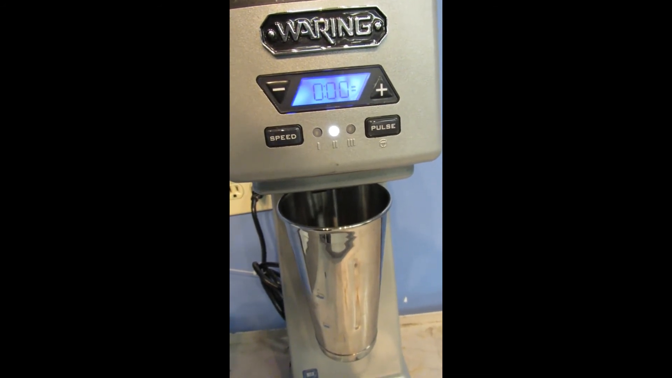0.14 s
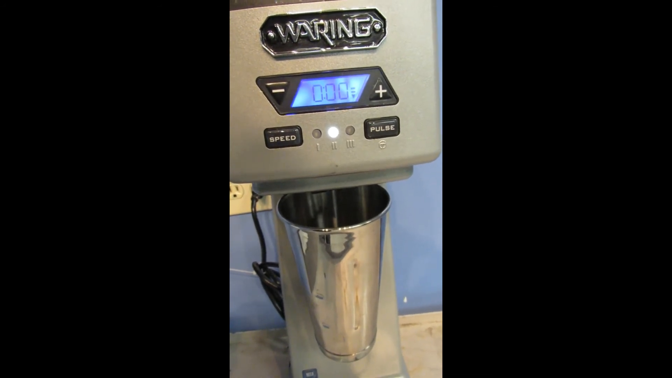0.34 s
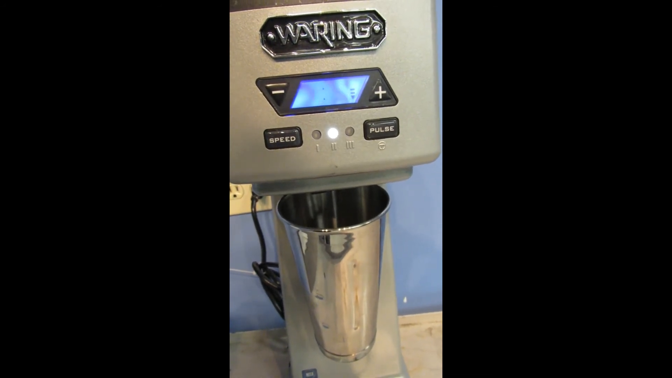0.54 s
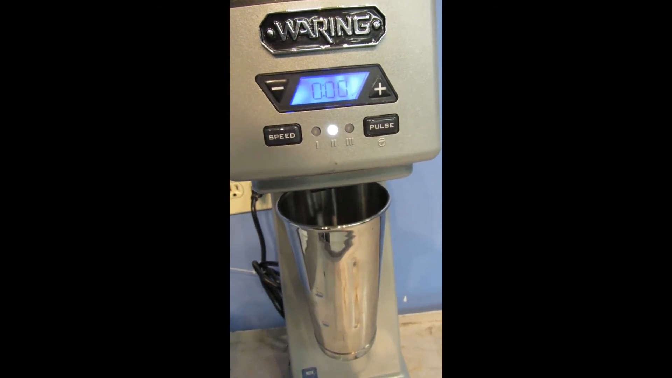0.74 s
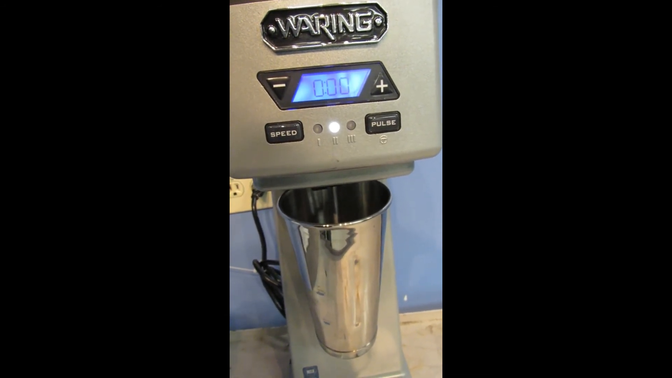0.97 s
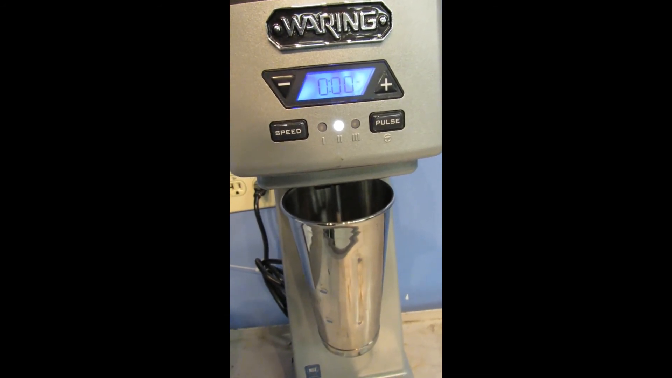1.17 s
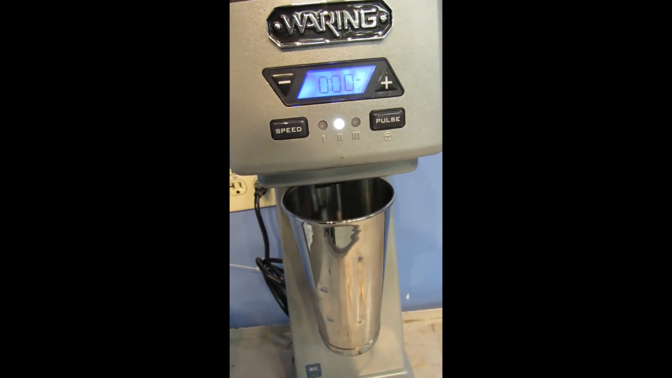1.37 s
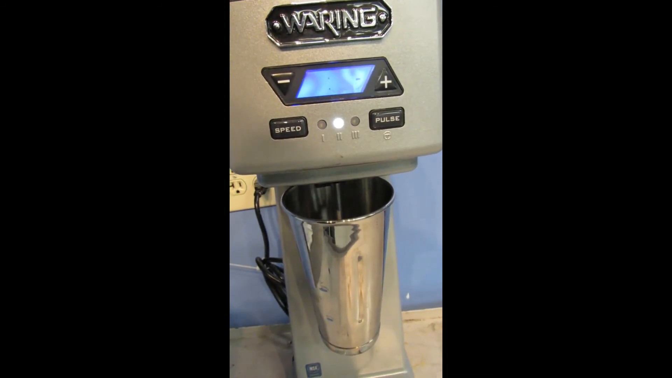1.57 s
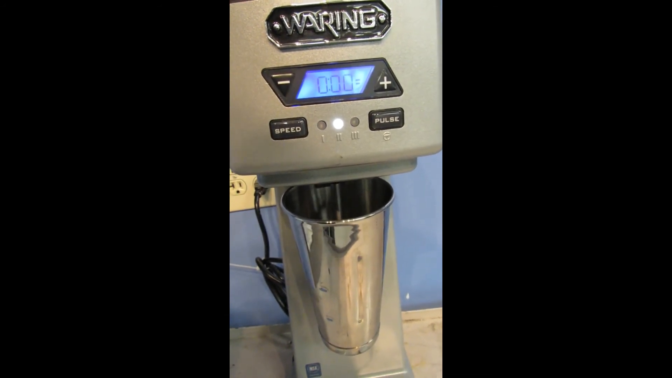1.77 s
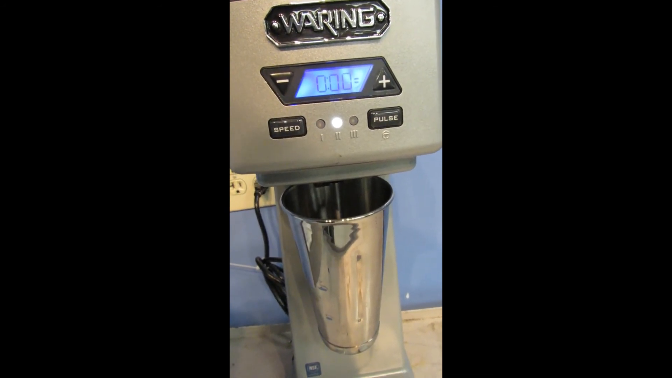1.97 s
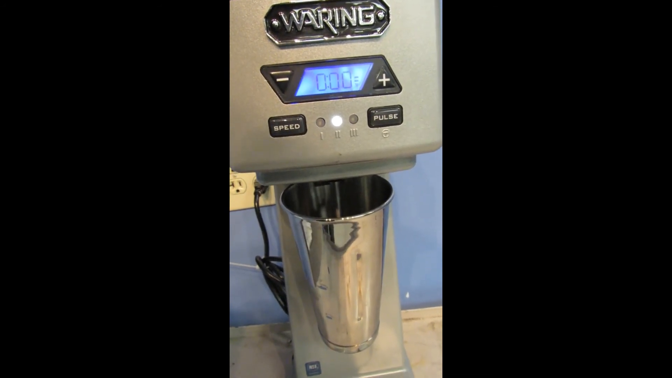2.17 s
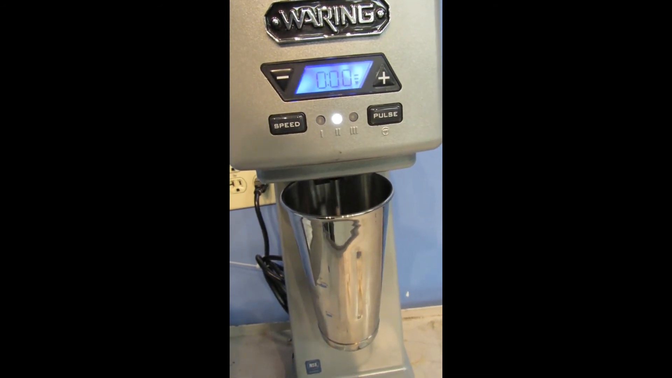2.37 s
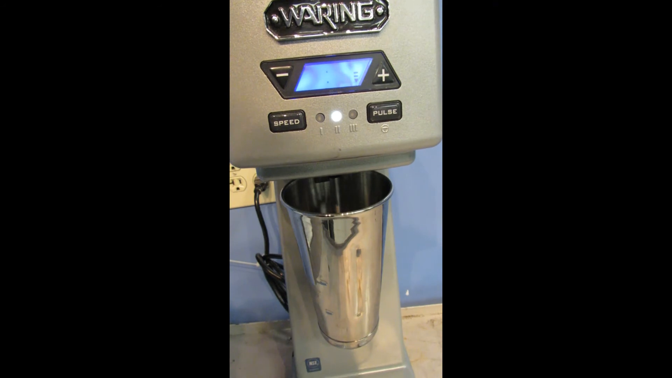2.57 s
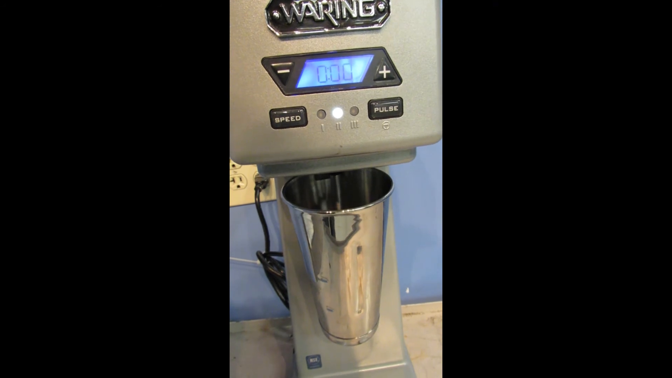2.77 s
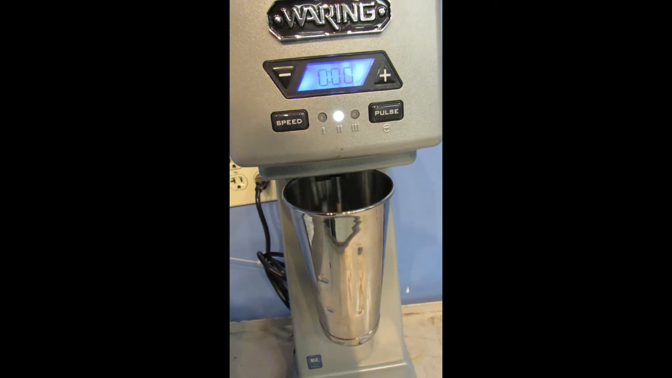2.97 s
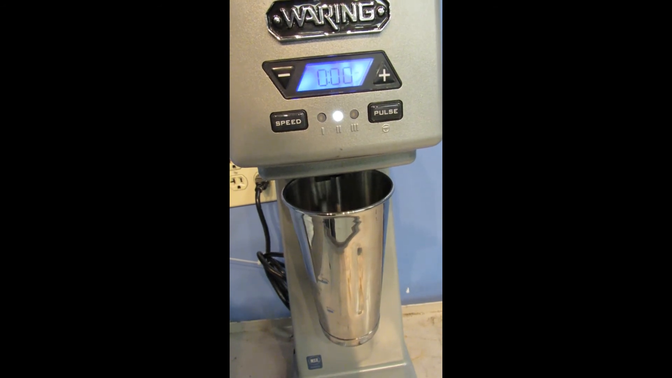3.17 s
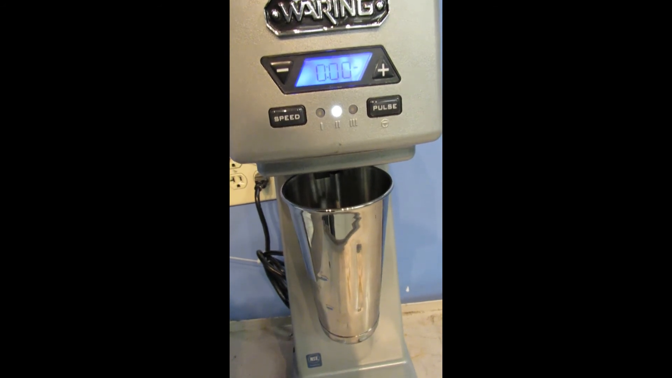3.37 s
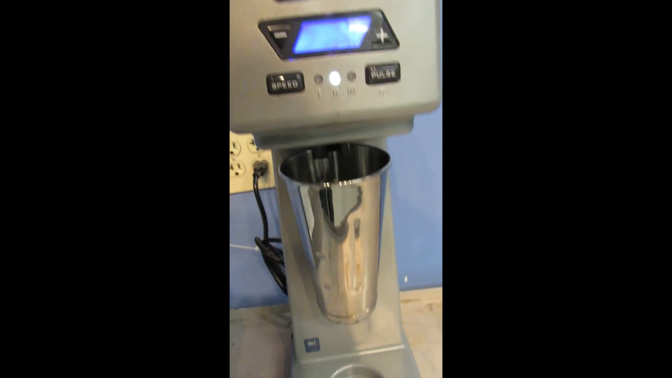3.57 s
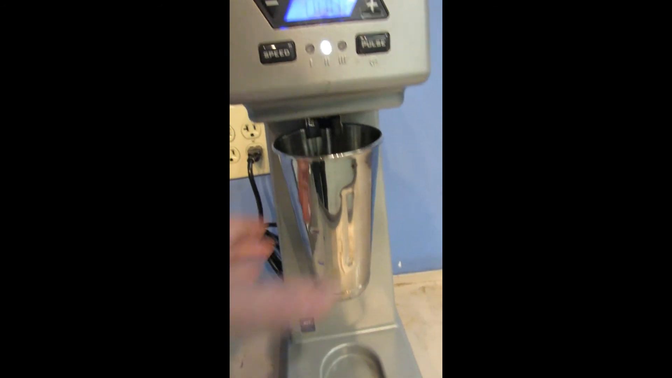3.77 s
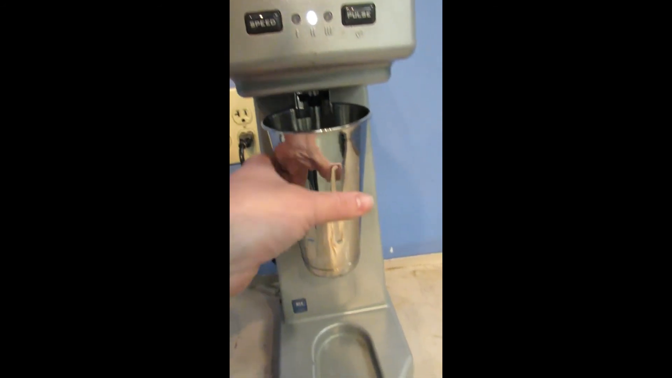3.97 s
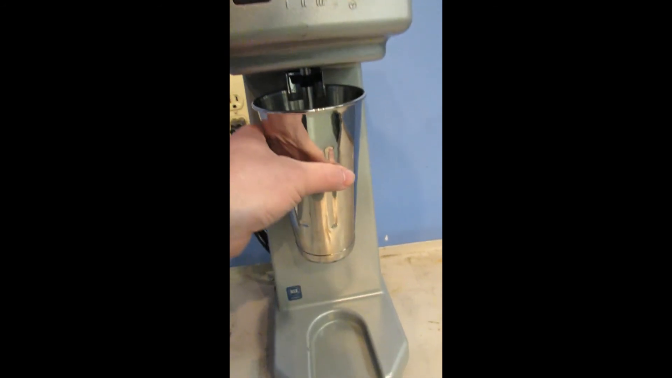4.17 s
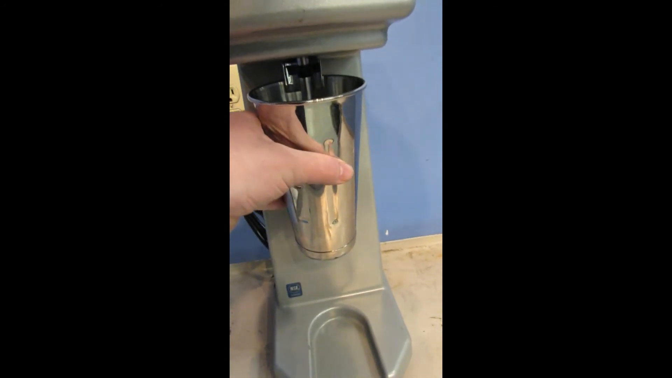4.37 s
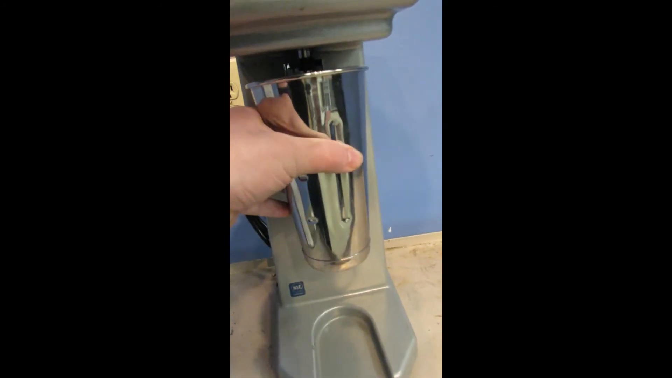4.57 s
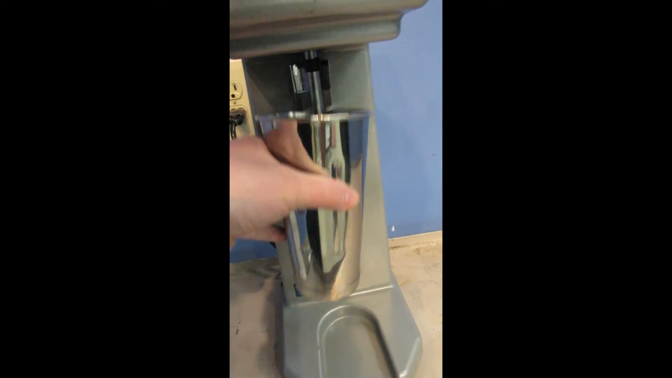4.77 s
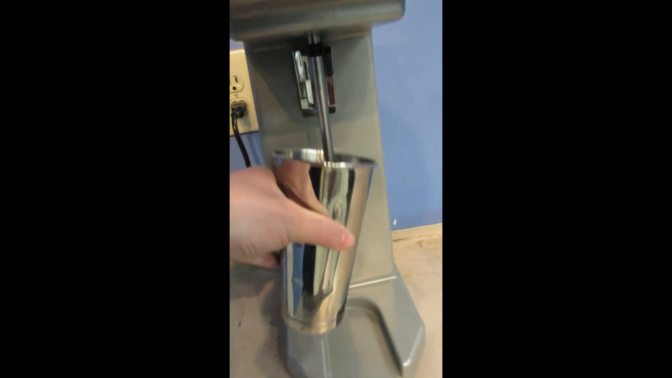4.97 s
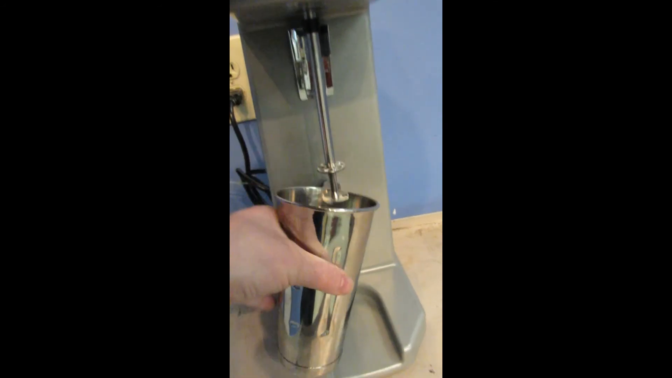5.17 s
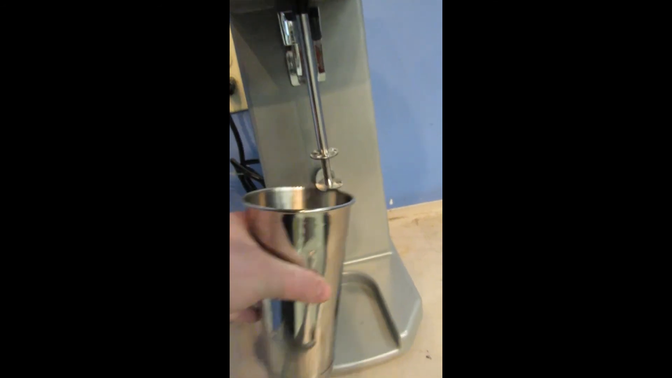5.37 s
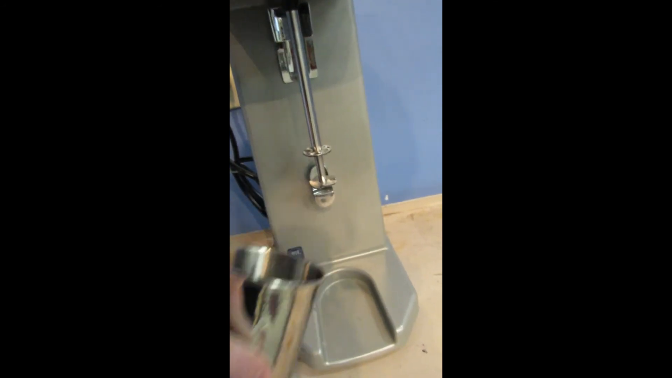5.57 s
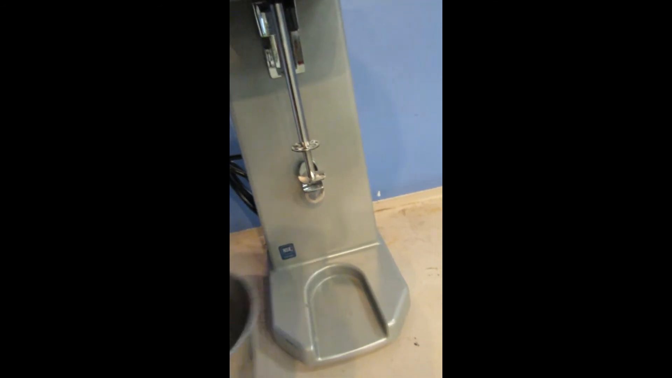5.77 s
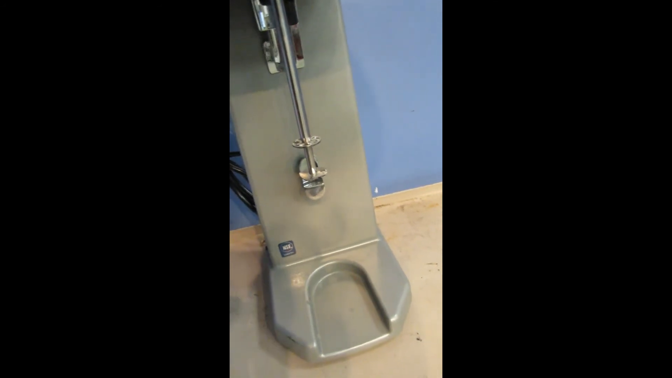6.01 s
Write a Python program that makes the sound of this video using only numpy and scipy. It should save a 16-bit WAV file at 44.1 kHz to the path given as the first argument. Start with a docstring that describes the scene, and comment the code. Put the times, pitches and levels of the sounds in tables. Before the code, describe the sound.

Close up in a small workroom, an electric drink mixer coasts to a stop with a falling whine and low hum, its steel cup rattling briefly at first. Faint ventilation and electrical hum remain. A sleeve swishes softly, then the cup is unhooked with sharp clanks, scrapes along its guide with a short squeal, knocks against the mixing shaft and lands on the counter with a thump.

```python
"""A small workroom, close to a spindle drink mixer that coasts to a stop over ventilation and mains hum.
Bearings and fan whirr and the rotor slots whine; the unbalanced shaft sweeps down through the
resonances of the stand and at first rattles the steel cup. A sleeve swishes, then a hand unhooks
the cup, slides it off its guide, knocks it on the agitator and sets it on the counter."""
import sys
import numpy as np
from scipy import signal
from scipy.fft import rfft, irfft, next_fast_len
from scipy.io import wavfile
from scipy.ndimage import uniform_filter1d

SR = 44100
rng = np.random.default_rng(int(sys.argv[2]) if len(sys.argv) > 2 else 0)


def waveform_to_disk(signal):
    """Save audio, clipped to [-1, 1], as 16-bit WAV at the path in sys.argv[1]."""
    frames = np.transpose(np.atleast_2d(signal))
    scaled = np.clip(frames, -1, 1) * 32767
    samples = np.round(scaled).astype(np.int16)
    wavfile.write(sys.argv[1], SR, samples)


N = 266364
T = np.arange(N) / SR
HZ = np.fft.rfftfreq(N, 1 / SR)
START_HZ = 276.4  # shaft speed at 0 s

# Bouts of cup chatter. Each row: start in s, length in s, level in dB, share lost by every second hit.
CHATTER_BOUTS = [(-.03, 0.15, -26, 0.85), (0.117, 0.12, -26, 0.33), (0.208, 0.09, -24, 1),
                 (0.313, 0.021, -25, 0.67), (0.388, 0.036, -22, 1)]
# Modes of the unhooked cup. Each row: frequency in Hz, level in dB, T60 in s before hand damping.
CUP_MODES = [(1002, -0.5, .22), (1271, 7.5, 0.17), (1785, -2, .22), (2330, 2, 0.16), (2595, 4, 0.097),
             (2720, 8.5, 0.13), (2934, -8.5, 0.4), (3140, -19.5, .16), (3700, -13, 0.23),
             (3800, -2.5, 0.13), (4620, 3, 0.12), (5400, -17, 0.085), (5927, -26, 0.26), (6900, -20.5, .14),
             (6640, -19, 0.055), (8800, -14, 0.14), (9100, -15, .12), (11000, -26.5, .1)]
# Low modes of stand and counter. Each row: frequency in Hz, level in dB, T60 in s.
THUMP_MODES = [(175, -17, .14), (269, -3, .17), (345, -6, .11), (409, -3, .13), (463, -2, .14),
               (545, -8, .11)]
# Radiation of the stand. Each row: frequency in Hz, gain in dB.
STAND_RADIATION = [(50, -26), (90, -4), (130, 1), (550, -2), (620, -22), (750, -8.5), (1000, -2.5),
                   (1500, -30)]


def amp(db):
    """Decibels to gain."""
    return 10 ** (np.asarray(db) / 20)


def unit(x):
    """Scales to rms 1."""
    return x / np.sqrt(np.mean(x ** 2) + 1e-20)


def curve(rows):
    """A time table at every sample."""
    return np.interp(T, *np.transpose(rows))


def at_hz(spectrum, hz):
    """Interpolates a table over log frequency."""
    table_hz, value = np.transpose(spectrum)
    return np.interp(np.log(hz + 1), np.log(table_hz + 1), value)


def colour(x, spectrum):
    """Filters by a table of Hz, dB."""
    size = next_fast_len(len(x) + SR // 10, True)
    gain = amp(at_hz(spectrum, np.fft.rfftfreq(size, 1 / SR)))
    return irfft(rfft(x, size) * gain, size)[:len(x)]


def noise(spectrum):
    """Coloured noise, rms 1."""
    return unit(colour(rng.standard_normal(N), spectrum))


def wander(hz):
    """Random drift below about hz, rms 1."""
    return unit(irfft(rfft(rng.standard_normal(N)) * np.exp(-(HZ / hz) ** 2), N))


def stereo_noise(spectrum):
    """Coloured noise, partly alike left and right."""
    # Each row: frequency in Hz, left-right correlation.
    correlation = [(60, 0.3), (180, 0.81), (550, 0.19), (1650, 0.42), (4970, 0.76), (15000, -0.049)]
    left, other = noise(spectrum), noise(spectrum)
    alike = np.clip(at_hz(correlation, HZ), 0, 1)
    right = irfft(alike * rfft(left) + np.sqrt(1 - alike ** 2) * rfft(other), N)
    return np.array([left, right])


def resonate(x, hz, width_hz):
    """One resonance, peak gain 1."""
    return signal.lfilter(*signal.iirpeak(hz, hz / width_hz, SR), x)


def body(x, resonances):
    """Resonances driven in parallel."""
    return sum(amp(db) * resonate(x, hz, width_hz) for hz, width_hz, db in resonances)


def ringing(modes, t, spread_db, detune):
    """Decaying modes, weighted and detuned at random for each contact."""
    draws = rng.standard_normal((len(modes), 2))
    return sum(amp(db + spread_db * a - 60 * t / t60_s) * np.sin(2 * np.pi * hz * (1 + detune * b) * t)
               for (hz, db, t60_s), (a, b) in zip(modes, draws))


def damped_sine(t, hz, cycles):
    """A swing that falls to 1/e in the given cycles."""
    return np.sin(2 * np.pi * hz * t) * np.exp(-t * hz / cycles)


def held(start_s, length_s, attack_s, release_s):
    """Envelope: linear rise, hold, exponential release."""
    rise = np.clip((T - start_s) / attack_s, 0, 1)
    return rise * np.exp(-np.maximum(T - start_s - length_s, 0) / release_s)


def swell(middle_s, half_s):
    """Bell-shaped envelope."""
    return np.exp(-np.minimum(((T - middle_s) / half_s) ** 2, 50))


def add(mix, start_s, sound):
    """Mixes a sound in at start_s."""
    part = mix[round(start_s * SR):][:len(sound)]
    part += sound[:len(part)]


def room(x, wet_db, early_db, side_db, early_s=0.0069, echoes_per_s=4000):
    """Adds dense reflections from counter and wall, and a tail that dies faster in the treble."""
    # Each row: frequency in Hz, T60 in s.
    decay = [(150, 1), (450, 0.67), (1200, 0.47), (3000, 0.3), (8000, 0.087), (15000, 0.11)]
    # Left-right difference of the reflections. Each row: frequency in Hz, gain in dB.
    spread = [(100, -10), (1000, 0), (2200, -9.5), (4500, -5.5), (9000, 8), (14000, 11)]
    t = np.arange(SR) / SR
    taps = rng.choice([-1., 1.], (2, SR)) * (rng.random((2, SR)) < echoes_per_s / SR) * (t > .002)
    hz, frame_s, bins = signal.stft(taps, SR, nperseg=256)
    fade = amp(-60 * frame_s / at_hz(decay, hz)[:, None])
    tail = signal.istft(bins * fade, SR, nperseg=256)[1][:, :SR]
    early = taps * np.exp(-t / early_s)
    response = (amp(wet_db) * unit(tail) + amp(early_db) * unit(early)) / np.sqrt(SR)
    mid, side = signal.fftconvolve(x[None], response, axes=1)[:, :N]
    return x + mid + amp(side_db) * colour(side, spread) * np.array([[1], [-1]])


def ambience(waver_rad=0.27):
    """Ventilation and mains hum, sinking at the end."""
    # Each row: frequency in Hz, relative density in dB.
    ventilation = [(15, -37.5), (25, -7), (86, -11.5), (122, -11), (148, -9.5), (246, -14.5), (297, -14.5),
                   (378, -12), (421, -15), (537, -17), (684, -33), (1110, -26.5), (2560, -39.5),
                   (13500, -44), (15500, -58.5)]
    # Each row: frequency in Hz, level in dB re the ventilation.
    mains = [(119.8, -5.5), (240, -9)]
    # Each row: time in s, level in dB.
    levels = [(2.6, -48.5), (4.0, -45.5), (5.1, -48), (5.8, -55)]
    hum = sum(amp(db) * unit(np.sin(2 * np.pi * hz * T + waver_rad * wander(1.9))) for hz, db in mains)
    return amp(curve(levels)) * (stereo_noise(ventilation) + hum)


def sleeve(dull_hz=1500, bright_hz=9000):
    """Cloth swishes as the arm reaches out, duller or brighter with each move."""
    # Each row: frequency in Hz, relative density in dB.
    spectrum = [(800, -4), (2000, -4), (5000, -9.5), (9000, 0.5), (12000, -5), (15000, -6.5)]
    # Each row: middle in s, half length in s, level in dB, treble tilt in dB.
    swishes = [(3.39, 0.047, -49.5, -7), (3.647, 0.16, -55, -7.5), (3.905, 0.28, -59, -1),
               (4.247, .07, -54.5, -7)]
    cloth = stereo_noise(spectrum)
    out = 0
    for middle_s, half_s, db, tilt_db in swishes:
        tilt = [(dull_hz, -tilt_db), (bright_hz, tilt_db)]
        out += amp(db) * swell(middle_s, half_s) * np.array([colour(side, tilt) for side in cloth])
    return out


def grip(middle_s=4.335, half_s=0.28, level_db=-45, width_hz=70, rub_db=-15):
    """The tightening grip rubs the cup on its holder and stirs the low modes of the stand."""
    # Each row: frequency in Hz, relative density in dB.
    rub_spectrum = [(500, -14), (1200, -6), (2700, 3.5), (5500, -7.5), (9000, -24)]
    stirred = body(rng.standard_normal(N), [(hz, width_hz, db) for hz, db, _ in THUMP_MODES])
    murmur = unit(colour(stirred, STAND_RADIATION))
    return amp(level_db) * swell(middle_s, half_s) * (murmur + amp(rub_db) * noise(rub_spectrum))


def slide(grain=.55, ring_db=-8, ring_width_hz=40, squeal_db=-3, full_squeal_db=-36):
    """Steel slips on steel in grains; pressed hard it squeals in stick-slip. The rubbing rings the cup."""
    # Strokes along the guide. Each row: start in s, length in s, level in dB.
    strokes = [(4.453, 0.11, -49.5), (4.68, 0.074, -56.5), (4.73, 0.12, -38), (4.852, 0.031, -32.5),
               (4.98, 0.5, -67.5)]
    # Each row: frequency in Hz, relative density in dB.
    scrape = [(410, -59.5), (700, -18.5), (861, -12), (1190, -2.5), (2110, -15.5), (2300, -3), (2800, -3.5),
              (3360, -14), (4030, -7), (5150, -10.5), (9230, -11), (13100, -18.5), (15500, -30.5)]
    # Each row: time in s, slips per second.
    slip_rate = [(4.74, 1580), (4.78, 1320), (4.82, 1260), (4.86, 1800), (4.9, 1750)]
    pressure = np.max([amp(db) * held(start_s, length_s, attack_s=0.011, release_s=0.0095)
                       for start_s, length_s, db in strokes], axis=0)
    rub = unit(noise(scrape) * np.exp(grain * wander(190)))
    slips = np.cumsum(curve(slip_rate) * (1 + .012 * wander(80))) / SR
    harmonics = sum(np.cos(2 * np.pi * k * slips) * (1 + .6 * wander(30)) / k ** .25 for k in range(1, 9))
    squeal = amp(squeal_db) * unit(harmonics) * np.minimum(pressure / amp(full_squeal_db), 1)
    ring = body(rub, [(hz, ring_width_hz, db) for hz, db, _ in CUP_MODES])
    return pressure * (rub + amp(ring_db) * unit(ring) + squeal)


def blows(knock_hz=1110, flex_hz=576, tick_s=0.0019, hand_damping=1.7, focus_db_per_octave=9):
    """Each blow on the cup: a damped knock, contact noise, the cup's ring, a thump of stand and counter."""
    # Each row: start in s, knock in dB, tick in dB, clatter decay in s, relative ring in dB,
    # relative thump in dB, thump centre in Hz.
    impacts = [(4.264, -29, -50, 0.008, -54, -41, 400), (4.443, -29.5, -54, .011, -44.5, -36, 400),
               (4.470, -18, -47.5, .011, -41, -34, 400), (4.4805, -7, -4, 0.0052, -39.5, -23, 304),
               (4.51, -10, -15.5, 0.04, -43, -6.5, 260), (4.531, -18.5, -19.5, 0.026, -32, -16, 266),
               (4.54, -23, -22, 0.017, -29, -14.5, 260), (4.802, -38, -31, 0.012, -39.5, -24, 327),
               (4.9078, -15.5, -29.5, 0.031, -37, -31, 388), (4.924, -21, -45, 0.0083, -43, -33.5, 400),
               (5.1886, 3, -12, 0.0027, -47, -10.5, 510), (5.3197, -21, -21.5, 0.023, -24, -17, 480),
               (5.362, -15.5, -23.5, 0.012, -36.5, -21.5, 449), (5.403, -26, -58, .011, -52, -18, 380),
               (5.9637, -8, -17.5, 0.047, -28.5, -3, 318.4), (5.975, -3, -31.5, 0.017, -43, -10, 240),
               (5.988, -11, -33, 0.035, -32, -9, 420)]
    # Each row: frequency in Hz, relative density in dB.
    tick_spectrum = [(120, -29.5), (500, -9.5), (1200, 8), (2700, 6), (3500, -0.5), (6000, 0.5), (8500, -4),
                     (12000, -8), (15000, -19.5)]
    out, t = np.zeros(N), np.arange(SR // 2) / SR
    contact = noise(tick_spectrum)
    gripped = [(hz, db, t60_s / hand_damping) for hz, db, t60_s in CUP_MODES]
    # The wall gives at the spot; the whole cup flexes more slowly.
    knock = damped_sine(t, knock_hz, cycles=1.2) + amp(-9) * damped_sine(t, flex_hz, cycles=1.2)
    for start_s, knock_db, tick_db, clatter_s, ring_db, thump_db, centre_hz in impacts:
        grit = contact[rng.integers(N - len(t)):][:len(t)]
        tick = grit * (np.exp(-t / tick_s) + amp(-15) * np.exp(-t / clatter_s))
        ring = amp(ring_db - 8) * ringing(gripped, t, spread_db=3.5, detune=.011)
        low_modes = [(hz, db - focus_db_per_octave * abs(np.log2(hz / centre_hz)), t60_s)
                     for hz, db, t60_s in THUMP_MODES]
        thump = amp(thump_db - 13.5) * ringing(low_modes + low_modes, t, spread_db=1, detune=.06)
        add(out, start_s, amp(knock_db) * knock + amp(tick_db) * tick + ring + thump)
    # Small objects radiate no deep bass.
    return signal.sosfilt(signal.butter(4, 160, "high", fs=SR, output="sos"), out)


def counter_thud(start_s=5.9645, level_db=-16, hz=185):
    """The counter takes the weight of the cup."""
    out, t = np.zeros(N), np.arange(SR // 2) / SR
    add(out, start_s, amp(level_db) * damped_sine(t, hz, cycles=4.2))
    return out


def shaft_hz(t=T, brake_hz_per_s=119.9, easing_hz_per_s2=20.3):
    """Friction brakes the shaft to rest; the braking eases steadily."""
    return np.maximum(START_HZ - brake_hz_per_s * t + easing_hz_per_s2 * t ** 2 / 2, 1e-6)


def shaft_turns(t=T):
    """Turns made so far."""
    return np.cumsum(shaft_hz(t)) / SR


def bearing_hiss(race_hz=9250, width_hz=650, level_db=-58, fade_hz=51.4):
    """Rolling balls excite one high resonance of the bearing race."""
    hiss = resonate(resonate(rng.standard_normal(N), race_hz, width_hz), race_hz, width_hz)
    rolling = 1 - np.exp(-(shaft_hz() / fade_hz) ** 4)
    return amp(level_db) * (shaft_hz() / START_HZ) ** .45 * rolling * unit(hiss)


def whine(fade_hz=135, ripple_db=1.5, ripple_step_hz=260):
    """Rotor slots sing at high shaft orders, swell across small housing resonances and fade with speed."""
    # Each row: multiple of the shaft speed, level in dB before the housing.
    slot_orders = [(23, -60), (24, -50), (25, -60), (29, -62), (48, -54), (72, -57), (96, -63), (113, -70),
                   (120, -66), (144, -66), (167, -68)]
    # Radiation of the housing. Each row: frequency in Hz, gain in dB.
    housing = [(900, -8), (2000, -2), (2400, 4), (3400, 2), (4500, 7), (5500, -6), (7500, -2), (9500, 1),
               (12000, -2), (14500, 2)]
    turns, speed_hz = shaft_turns(), shaft_hz()
    grid_hz = np.arange(0, SR / 2, ripple_step_hz)
    peaks_db = ripple_db * rng.standard_normal(SR // 100)[:len(grid_hz)]
    tones = 0
    for order, db in slot_orders:
        hz = order * speed_hz
        antialias = np.clip((SR / 2 - hz) / 1000, 0, 1)
        tone = np.cos(2 * np.pi * order * turns + .5 * wander(90)) * amp(2 * wander(20))
        tones += antialias * amp(db + np.interp(hz, grid_hz, peaks_db)) * tone
    return colour(tones * np.minimum(speed_hz / fade_hz, 1) ** 2.5, housing)


def chatter_envelopes():
    """Gain over time, one row per bout."""
    return np.array([amp(db) * held(start_s, length_s, attack_s=0.035, release_s=0.022)
                     for start_s, length_s, db, _ in CHATTER_BOUTS])


def whirr(level_db=-31.5, bearing_share=0.17, throb=0.058, buzz_db=-7):
    """Bearings repeat a rough pattern each turn, fan air throbs, and chatter buzzes the same housing."""
    # Each row: frequency in Hz, relative density in dB.
    spectrum = [(380, -51), (650, -20.5), (882, -5.5), (1050, 3.5), (1350, -7.5), (1600, -3), (2230, -7),
                (3070, -8), (3370, -15), (4170, -11.5), (5430, -18), (9490, -19), (12000, -26.5),
                (14300, -19.5), (15500, -40)]
    turns = shaft_turns()
    patterns = signal.resample(rng.standard_normal((3, 256)), 2 ** 13, axis=1)
    angle_index = (turns % 1 * patterns.shape[1]).astype(int)
    bearings = unit(colour(sum(pattern[angle_index] * wander(1.72) for pattern in patterns), spectrum))
    air = noise(spectrum) * (1 + throb * np.cos(2 * np.pi * turns))
    flutter = 1 + .13 * wander(50)
    running = amp(level_db) * (shaft_hz() / START_HZ) ** 1.71
    buzz = amp(buzz_db) * chatter_envelopes().max(axis=0)
    blend = np.sqrt(bearing_share) * bearings + np.sqrt(1 - bearing_share) * air
    return np.hypot(running, buzz) * blend * flutter


def chatter(uneven=0.11, grit=0.02, clamp_hz=7800):
    """The cup hits its holder once a turn, limping strong-weak; the contact point shifts."""
    # Resonances of the clamped cup. Each row: frequency in Hz, width in Hz, relative level in dB.
    clamped_modes = [(1036, 24, -14.5), (1067, 31, 7.5), (1330, 25, -3), (1603, 130, 7.5), (1837, 43, 9.5),
                     (2568, 140, 7.5), (2783, 25, 13), (4100, 490, -9), (4610, 140, -18.5),
                     (5100, 200, -45), (6220, 940, -14.5), (8410, 2200, -42)]
    turns = shaft_turns() + .0065 * wander(150) + .03 * wander(12)
    count = np.floor(turns)
    bouts = chatter_envelopes()
    limp = np.array([share for *_, share in CHATTER_BOUTS])[bouts.argmax(axis=0)]
    force = (1 - limp * (count % 2)) * np.exp(uneven * wander(140))
    hits = np.diff(count, prepend=count[0])
    grinding = grit * np.exp(-(turns % 1) / .4) * rng.standard_normal(N)
    ring = sum(amp(db + 2 * wander(33)) * resonate(force * (hits + grinding), hz, width_hz)
               for hz, width_hz, db in clamped_modes)
    ring = signal.sosfilt(signal.butter(2, clamp_hz, fs=SR, output="sos"), ring)  # holder damps treble
    running_rms = np.sqrt(abs(uniform_filter1d(ring ** 2, size=2000)) + 1e-14)
    return bouts.max(axis=0) * ring / running_rms


def unbalance(roughness=0.19):
    """The shaft shakes the stand, which booms each time an order crosses a resonance."""
    # Shaking force. Each row: multiple of the shaft speed, level in dB at the starting speed.
    orders = [(1, 0.5), (2, -7), (3, -9.5), (4, -13), (5, -14.5), (6, -16.5), (7, -18.5), (8, -21.5),
              (9, -23.5), (10, -26.5)]
    # Each row: frequency in Hz, width in Hz, gain in dB.
    stand_modes = [(107, 3, -26), (153.3, 4.1, -12.5), (172.3, 2.1, -16.5), (238.5, 7, -16.9),
                   (255.6, 4, -4.2), (275.9, 8.7, -11.8), (404.7, 57, -16.5), (455.7, 5.1, -10),
                   (531.7, 5, -25)]
    t = np.arange(-SR // 4, N) / SR  # lead-in: the stand already rings at 0 s
    turns = shaft_turns(t)
    force = sum(amp(db) * np.cos(2 * np.pi * order * turns) for order, db in orders)
    shaken = body(force * shaft_hz(t) / START_HZ, stand_modes)
    return colour(shaken, STAND_RADIATION)[-N:] * (1 + roughness * wander(63.7))


def scene():
    """Mixer, cup and room in stereo; gain pairs are left and right."""
    boom = room(unbalance(), wet_db=-17, early_db=-26, side_db=1) * amp([[-1], [1]])
    motor = room(whirr() + whine() + bearing_hiss(), wet_db=-12, early_db=-15, side_db=-3.5) * amp(-1.5)
    rattle = room(chatter(), wet_db=-9.5, early_db=-1, side_db=-8.5)
    handling = blows() + counter_thud() + slide() + grip()
    cup = room(handling, wet_db=-12, early_db=-4, side_db=-8.5) * amp([[-.5], [-1.3]])
    return boom + motor + rattle + cup + sleeve() + ambience() * amp([[-.7], [.7]])


def record(dry):
    """Soft clipping of the loudest blows, then a band limit."""
    ceiling, edge_hz = .97, 15150
    limited = dry / (1 + (dry / ceiling) ** 6) ** (1 / 6)
    lowpass = signal.firwin(511, edge_hz, window=("kaiser", 9), fs=SR)
    return signal.oaconvolve(limited, lowpass[None], "same")


dry = scene()
out = record(dry)
waveform_to_disk(out)
```